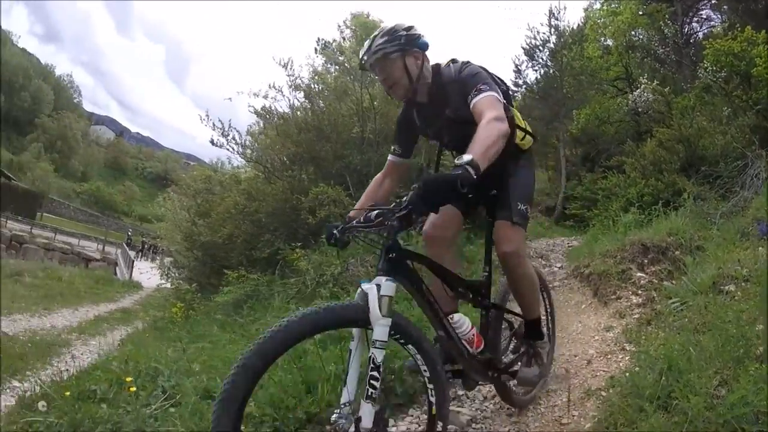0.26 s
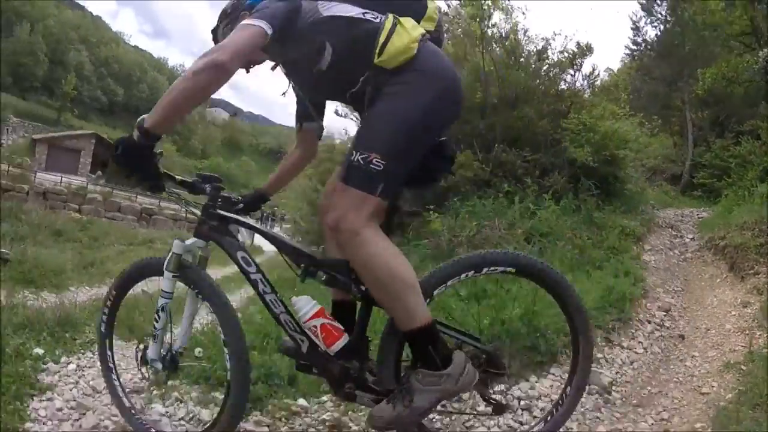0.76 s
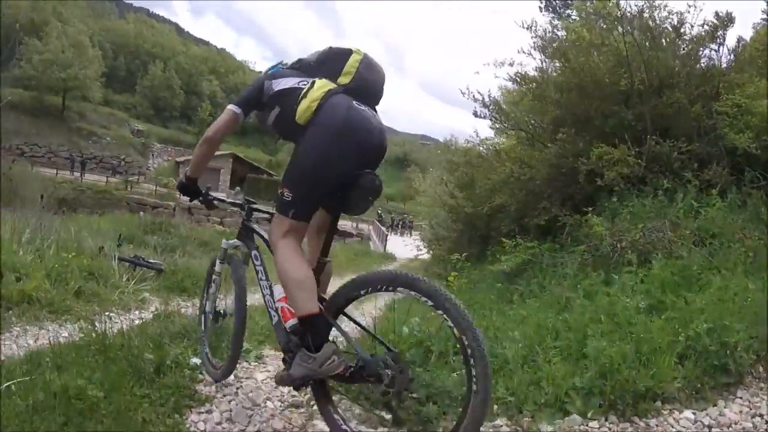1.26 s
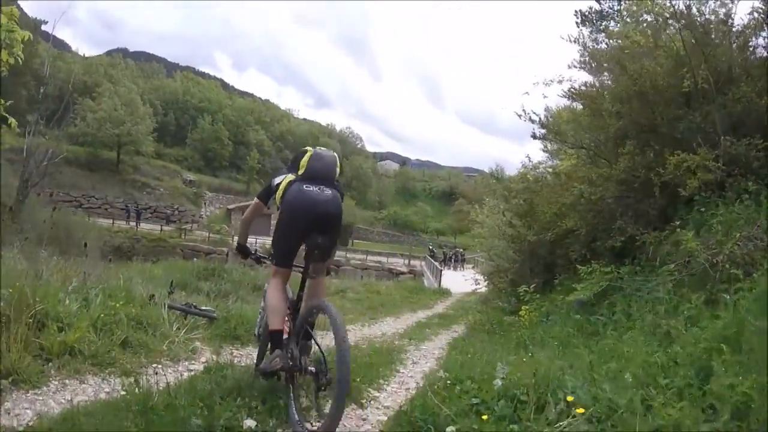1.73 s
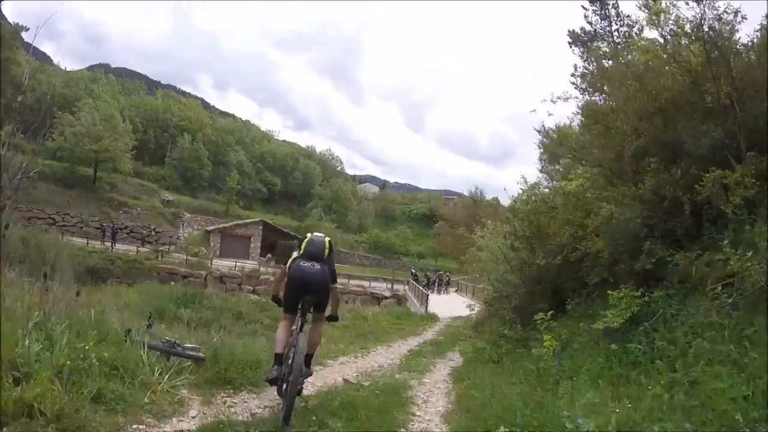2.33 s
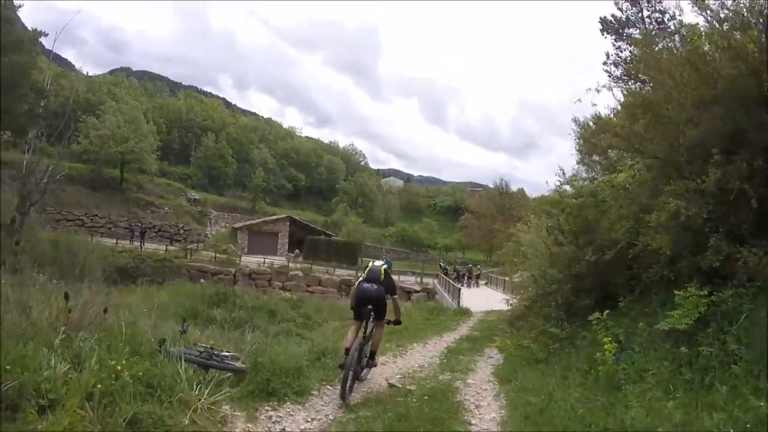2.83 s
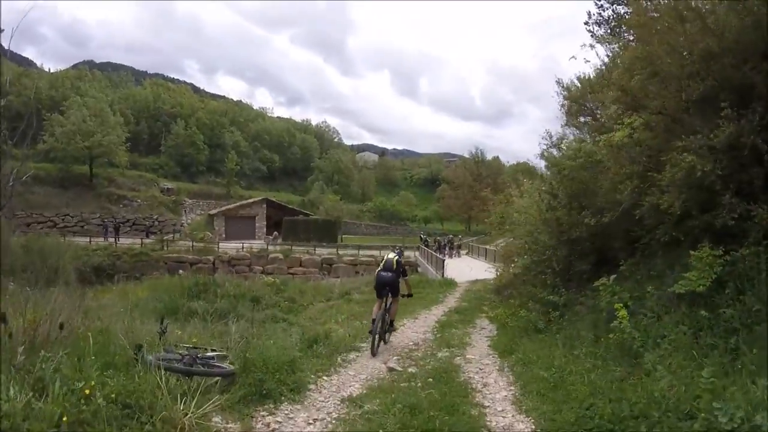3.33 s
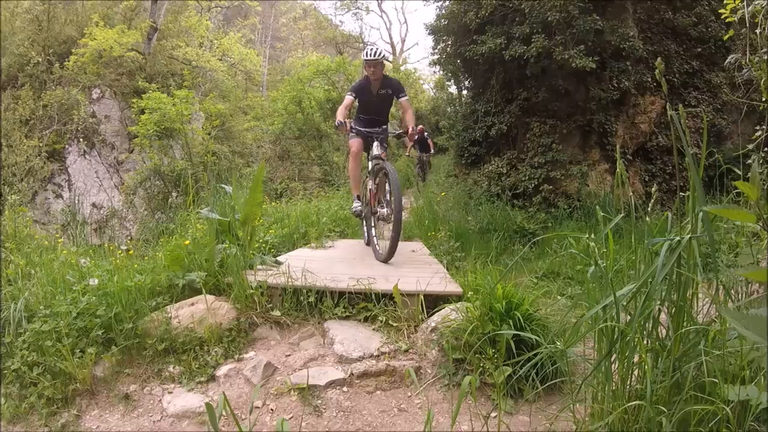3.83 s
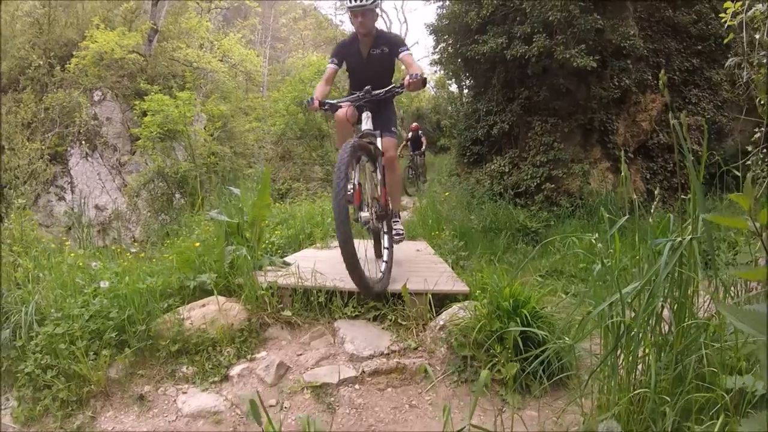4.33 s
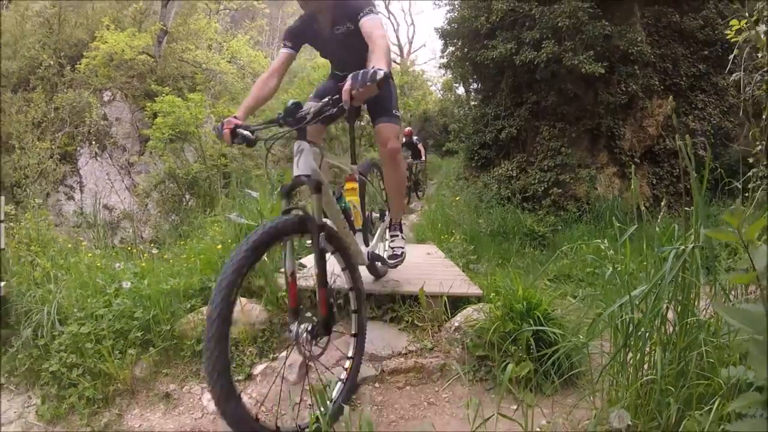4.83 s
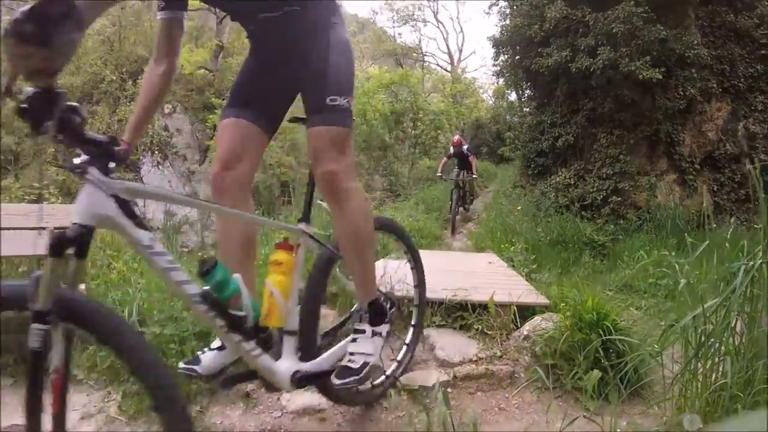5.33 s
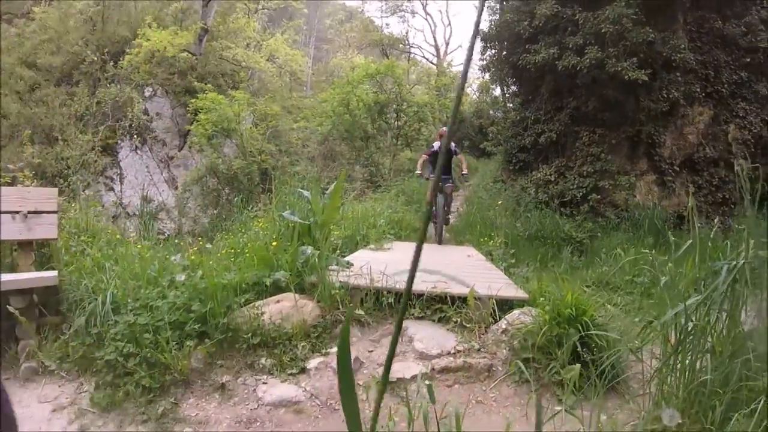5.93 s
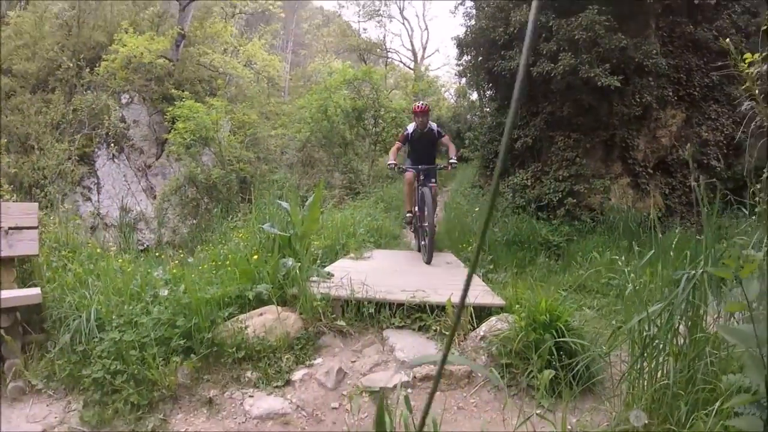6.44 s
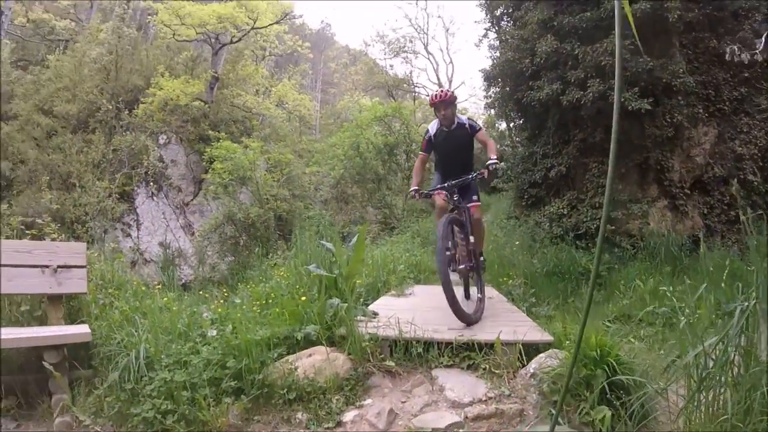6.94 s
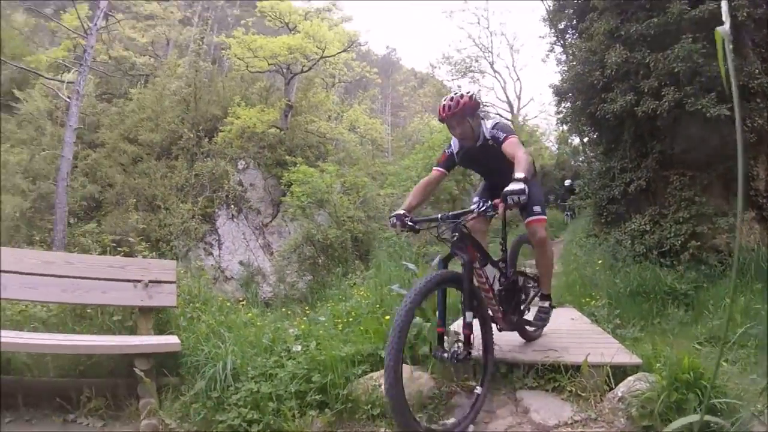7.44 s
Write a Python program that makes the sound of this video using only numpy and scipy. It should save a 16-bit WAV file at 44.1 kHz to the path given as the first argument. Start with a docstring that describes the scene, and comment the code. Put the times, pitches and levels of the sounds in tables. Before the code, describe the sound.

A mountain bike ploughs through loose gravel right beside a small hand-held camera, stones snapping sharply, then recedes. Loud plastic taps and finger rubs knock the case over low rumble and faint hiss. The sound drops out for an instant; afterwards, on a quieter outdoor trail, a few stones crack, a freewheel ticks quickly past, and soft handling thuds follow.

```python
"""Gravel trail: mountain bikes roll past a small hand-held camera; the sound cuts out briefly midway.
Tyres crunch and crack stones: noise grains and bursts through the resonances of the microphone port.
A freewheel ticks: pulses ring the hub. Fingers tap, flick and rub: noise rings the plastic case.
Arm sway, wind, grip throb and case hum rumble below: shaped noise. Far leaves and microphone hiss on."""
import sys
import numpy as np
from scipy import signal
from scipy.fft import rfft, irfft, next_fast_len
from scipy.io import wavfile
from scipy.ndimage import map_coordinates

SR = 44100
rng = np.random.default_rng(int(sys.argv[2]) if len(sys.argv) > 2 else 0)


def bounce(signal):
    """Save signal as a 16-bit WAV file at the path given by the first command-line argument."""
    frames = np.transpose(np.atleast_2d(signal))
    limited = np.clip(frames, -1, 1)
    pcm = np.round(limited * 32767).astype(np.int16)
    wavfile.write(sys.argv[1], SR, pcm)


N = 338688


def amp(db):
    """Gain of a level in dB."""
    return 10 ** (np.asarray(db) / 20)


def unit(x):
    """x at rms 1."""
    return x / np.sqrt(np.mean(x ** 2) + 1e-20)


def seconds():
    """Time of each sample in s."""
    return np.arange(N) / SR


def curves(rows):
    """One value per sample for each column after the time."""
    knots_s, *cols = np.transpose(rows)
    return [np.interp(seconds(), knots_s, col) for col in cols]


def wobble(knots_per_s):
    """Smooth random curve through normal draws."""
    knots = rng.standard_normal(400)
    return map_coordinates(knots, [np.arange(N) * knots_per_s / SR], mode="wrap")


def swells(times_s, levels_db, rise_s, fall_s):
    """Summed gain of swells: Gaussian rise to the peak, exponential fall."""
    out = np.zeros(N)
    for peak_s, db, fall in zip(times_s, levels_db, np.broadcast_to(fall_s, len(times_s))):
        u = seconds() - peak_s
        out += amp(db) * np.exp(-np.where(u < 0, (u / rise_s) ** 2, u / fall))
    return out


def filtered(x, response):
    """x times a complex response of frequency."""
    size = next_fast_len(x.shape[-1] + 8192)
    spectrum = rfft(x, size) * response(np.fft.rfftfreq(size, 1 / SR))
    return irfft(spectrum, size)[..., :x.shape[-1]]


def coloured(points):
    """Noise of rms 1 with a (f/Hz, relative density/dB) spectrum, linear in log f."""
    f, db = np.transpose(points)
    shape = lambda hz: amp(np.interp(np.log(hz + 1), np.log(f), db, -120, -120))
    return unit(filtered(rng.standard_normal(N), shape))


def modes(table, sign):
    """Sum of resonances; like signs leave notches between them, alternate signs fill the valleys."""
    def response(f):
        total = 0
        for k, (centre_hz, width_hz, db) in enumerate(table):
            damping = 1j * f * width_hz
            total = total + sign ** k * amp(db) * damping / (centre_hz ** 2 - f * f + damping)
        return total
    return response


def dull(f, cutoff_hz):
    """Soft contact: a steep causal low-pass of order 8."""
    x = f / cutoff_hz
    return 1 / np.prod([1 - x ** 2 + 2j * np.sin(np.pi * k / 16) * x for k in (1, 3, 5, 7)], axis=0)


def grains(rate, spread_db, life, noise):
    """Random noise puffs, rate a second, decay constant life samples, over a share of plain noise."""
    chance, size = rng.random((2, N))
    size_db = np.minimum(-spread_db * np.log(1 - size), 16)
    starts = amp(size_db) * (chance < rate / SR)
    u = np.arange(400) / life
    puffs = signal.fftconvolve(starts, u * np.exp(-u))[:N] * rng.standard_normal(N)
    return unit(unit(puffs) + noise * rng.standard_normal(N))


def bursts(rows, body, rise, click):
    """Short decaying noise bursts through a body, each scaled to its peak."""
    out, t = np.zeros(N + 4096), np.arange(4096) / SR
    for start_s, peak_db, hz, share_db, t60_s in rows:
        decay = amp(-60 * t / max(t60_s, .001))
        push = rng.standard_normal(len(t)) * decay * (1 - np.exp(-t / rise))
        push[round(rise * SR)] += click  # hard contact
        hit = filtered(push, lambda f: body(f, hz, share_db))
        out[round(start_s * SR):][:len(t)] += amp(peak_db) * hit / np.abs(hit).max()
    return out[:N]


# steady tyre roll: t/s, big-stone level/dB, small over big/dB
ROLL = [(0.0, -49.5, -4.5), (0.2, -47, -15.5), (0.4, -53, -1.5), (0.65, -61.5, -6), (0.95, -62.5, -4.5),
        (1.3, -60.5, -10), (1.47, -71.5, -4), (1.76, -53.5, -14.5), (2.0, -62.5, -11), (2.1, -77.5, -20.5),
        (2.4, -62, -12.5), (3.74, -59, -13.5), (3.8, -62, -9.5), (5.3, -60.5, -12), (5.45, -56.5, -11),
        (6.05, -57.5, -6), (6.15, -56, -18), (6.5, -57, -17), (6.9, -61.5, -10), (7.05, -62, -13.5),
        (7.3, -57.5, -18), (7.68, -57, -15)]
# wheel ploughing through loose gravel: t of peak/s, big-stone level/dB, t60/s, small over big/dB
HEAPS = [(0.1, -55.5, 0.75, -20), (0.199, -47, .3, -20), (0.33, -50.5, 0.64, -26), (0.5, -53, 0.62, -10),
         (0.688, -48.5, 0.43, -7.5), (0.817, -40.5, 0.22, -13), (0.969, -53, 0.32, -9),
         (1.013, -42.5, 0.036, -13), (1.082, -48, 0.25, -13), (1.22, -53, 0.23, -6),
         (1.279, -48.5, .4, -10), (1.531, -47, .12, -10.5), (1.577, -52.5, 0.13, -15)]
HEAP_RISE_S, MIDDLE_OVER_BIG_DB = 0.0064, -2.5
# microphone port resonances: f/Hz, width/Hz, level before the factor of PORT_SIGN/dB
PORT = [(950, 890, -17), (1587, 114, 3.5), (2513, 385, -4), (3364, 554, -7.5), (5600, 470, -15),
        (6040, 390, -9), (7580, 950, -15.5), (9010, 710, -18.5), (11000, 1140, -29), (14100, 1200, -36)]
PORT_SIGN = -1.076  # factor from each mode to the next


def crunch():
    """Big, middle and small gravel: grains of three lives in three bands, through the port."""
    roll_db, small_db = curves(ROLL)
    peak_s, heap_db, t60_s, fine_db = np.transpose(HEAPS)
    fall_s = np.abs(t60_s) / np.log(1000)
    big = amp(roll_db) + swells(peak_s, heap_db, HEAP_RISE_S, fall_s)
    small = amp(roll_db + small_db) + swells(peak_s, heap_db + fine_db, HEAP_RISE_S, fall_s)
    middle = big * amp(MIDDLE_OVER_BIG_DB)
    port = modes(PORT, sign=PORT_SIGN)
    clumps = amp(1.0 * wobble(30))
    sizes = [
        (big, lambda f: dull(f, 2450), grains(rate=300, spread_db=1.5, life=68, noise=0.87)),
        (middle, lambda f: dull(f, 4960) * (f > 1900), grains(rate=430, spread_db=5.5, life=30, noise=1.0)),
        (small, lambda f: f > 4300, grains(rate=460, spread_db=1.0, life=7.1, noise=0.83))]
    out = np.zeros(N)
    for gain, band, x in sizes:
        out += gain * clumps * unit(filtered(x, lambda f: port(f) * band(f)))
    return out


# stones cracking under the tyres: t/s, peak/dB, pitch f/Hz, low-passed share/dB
STONES = [(0.0464, -28, 2600, 6), (0.124, -41, 2480, -8), (0.172, -28, 2560, 7), (0.214, -29, 2200, 18),
          (0.2333, -28.5, 3180, 5), (0.265, -42, 2710, -5), (0.3125, -31, 2420, 7),
          (0.346, -25.5, 3270, -23), (0.377, -37, 2570, -8), (0.407, -31, 2500, 3),
          (0.4808, -33.5, 5970, -13), (0.7085, -31.5, 2370, 6), (0.76, -39, 3370, 0),
          (0.821, -44, 3280, -9), (0.857, -31.5, 2450, 6), (0.9455, -41, 2330, -20),
          (1.0197, -22, 2700, 3.5), (1.0815, -36, 3420, -21), (1.157, -38.5, 3420, -7),
          (1.2156, -50, 2340, 4), (1.28, -30, 2740, -21), (1.3196, -34.5, 2630, -7),
          (1.347, -36.5, 2950, -18), (1.38, -32, 2770, -8.5), (1.412, -36, 3370, 5),
          (1.529, -33, 2340, -18), (1.5776, -30, 2170, -5), (1.59, -32.5, 2400, -20),
          (1.7643, -32.5, 2720, -25), (1.969, -41, 2610, -17), (2.641, -36.5, 2500, -1),
          (4.8663, -40.5, 2560, -15), (4.9207, -29.5, 2540, 5), (5.004, -28, 3350, -4),
          (5.385, -37.5, 4720, -2), (5.445, -46, 4800, -10), (5.5016, -43, 4770, -12),
          (5.5875, -41, 3250, -28), (5.698, -31.5, 2620, 4), (5.8046, -29.5, 3640, -12),
          (7.14, -41, 2660, -8)]
STONE_T60_S = 0.023


def stones():
    """Each stone: a noise burst through one broad resonance plus a low-passed share, then the port."""
    port = modes(PORT, sign=PORT_SIGN)

    def stone(f, hz, weight_db):
        crack = modes([(hz, .4 * hz, 0)], sign=1)(f)
        return port(f) * (crack + amp(weight_db) * dull(f, 2400))
    return bursts([(*row, STONE_T60_S) for row in STONES], stone, rise=.0006, click=3.6)


# hub modes: f/Hz, width/Hz, level/dB
HUB = [(3300, 100, 0), (5860, 66, -5), (8550, 120, -18)]
COAST_START_S, COAST_END_S, COAST_FADE_S, COAST_DB = 5.33, 6.1, 0.057, -57.5
TICKS_PER_S, TICKS_GAIN_PER_S2 = 52, 21  # the bike gathers speed downhill
WHIRR = 0.078  # steady drag of the pawls between ticks


def freewheel():
    """Pawls tick over the ratchet, a little unevenly; each tick rings the hub modes at new strengths."""
    t = seconds()
    coast_s = np.clip(t - COAST_START_S, 0, COAST_END_S - COAST_START_S)
    rate = TICKS_PER_S + TICKS_GAIN_PER_S2 * coast_s
    tooth_count = np.floor(np.cumsum(rate) / SR + .3 * wobble(40))
    teeth = np.diff(tooth_count, prepend=0) > 0
    ticks = teeth * amp(2.2 * rng.standard_normal((len(HUB), N)))
    ticks = signal.fftconvolve(ticks, np.hanning(90)[None], axes=1)[:, :N]
    ticks = (ticks + WHIRR) * rng.standard_normal(N)
    ring = sum(filtered(tick, modes([mode], sign=1)) for tick, mode in zip(ticks, HUB))
    # heard only while the bike is close
    near = np.clip(np.minimum(t - COAST_START_S, COAST_END_S - t) / COAST_FADE_S, 0, 1)
    return amp(COAST_DB) * near * unit(ring)


# plastic case, wall and cavity: f/Hz, width/Hz, level per pass (two passes)/dB
CASE = [(1600, 400, -4), (2060, 330, -1), (2510, 420, 0), (2950, 550, -2.5), (3970, 400, -1.5),
        (4750, 420, -7.5), (5550, 400, -11), (6080, 450, -5.5), (7600, 850, -7.5), (8950, 800, -14),
        (10600, 1300, -21), (12300, 1200, -20), (13500, 1200, -18), (14900, 1200, -17)]
# case walls bending under a heavy touch: f/Hz, width/Hz, level/dB
FLEX = [(790, 140, 0.5), (1557, 830, 5)]


def touch(f, hz, weight_db):
    """The case under a fingertip, which dulls the treble and bends the walls."""
    case = modes(CASE, sign=1)(f) ** 2
    return (case + amp(weight_db) * modes(FLEX, sign=1)(f)) * dull(f, hz)


# fingertip taps: t/s, peak/dB, low-pass f/Hz, wall flex/dB, t60/s, thud/dB
TAPS = [(2.0318, -0.6, 9300, -25, 0.011, -31), (2.915, -41, 7900, -18, 0.024, -38),
        (2.952, -24.5, 6900, -18, .04, -29), (3.3353, -37.5, 7760, -7, 0.013, -58),
        (3.3593, -2, 2920, 11, 0.016, -14), (3.4173, -16, 3020, 4, 0.015, -27),
        (3.463, -15, 2960, -9, 0.014, -39), (3.5139, -20, 3300, -24.5, .012, -29),
        (3.903, -35.5, 9000, -11, 0.014, -44), (3.966, -49, 1480, -4, .01, -31.5),
        (5.547, -37.5, 1700, -15, 0.018, -31), (5.699, -52, 1500, 0, .01, -31),
        (6.012, -51, 805, 3, 0.0087, -24.5), (6.15, -42, 1500, -5, 0.014, -39),
        (6.273, -38, 2000, 0, 0.0092, -47), (6.477, -37.5, 2000, 3, 0.013, -34),
        (6.85, -32.5, 2560, 0, 0.008, -40), (6.892, -38, 3000, 2, .01, -35),
        (6.911, -51, 2540, 0, 0.009, -36), (6.933, -52, 2400, 0, 0.012, -30.5)]
# lowest case mode: f/Hz, width/Hz
HUM = (327.7, 56)


def taps():
    """Noise bursts ring the case; each tap adds a thud, its lowest mode plus a short push."""
    out = bursts([row[:5] for row in TAPS], touch, rise=.0009, click=5)
    u = np.arange(4096) / SR
    ring = np.sin(2 * np.pi * HUM[0] * u) * np.exp(-np.pi * 1.3 * HUM[1] * u)
    push = 0.24 * u / 0.0011 * np.exp(1 - u / 0.0011)
    for row in TAPS:
        out[round(row[0] * SR):][:len(u)] += amp(row[5]) * (ring + push)
    return out


# fingernail flicks: t/s, peak/dB, low-pass f/Hz, treble lift at 4 kHz/dB, t60/s
FLICKS = [(2.032, -22, 15000, 1, 0.0059), (3.045, -42, 9500, -6, 0.018), (3.1247, -31, 11000, -13, 0.019),
          (3.5139, -34, 9100, -17, 0.017), (3.7226, -25.5, 10900, 2, 0.016)]


def flicks():
    """Fingernail bursts ring the case; the nail lifts the treble."""
    def nail(f, hz, lift_db):
        lift = 1 + amp(lift_db) * (f / 4000) ** 2
        return modes(CASE, sign=1)(f) ** 2 * lift * dull(f, hz)
    return bursts(FLICKS, nail, rise=.001, click=1.5)


# finger strokes: start t/s, end t/s, level/dB, change along stroke/dB, low-pass f/Hz, wall flex/dB
STROKES = [(2.03, 2.06, -32.5, -14, 8050, -24), (2.158, 2.194, -48, -10, 8250, -31),
           (2.236, 2.341, -47.5, 2.5, 8200, -37), (2.388, 2.431, -52.5, -1.5, 8150, -32),
           (2.947, 3.057, -42.5, -15.5, 8300, -7), (3.04, 3.138, -50, -6, 7850, -19),
           (3.364, 3.414, -54, -2, 3970, 3), (3.402, 3.478, -50, -4, 6600, 2),
           (3.55, 3.644, -44.5, 8, 3060, 4), (3.557, 3.617, -51, -8, 8800, -15),
           (3.644, 3.688, -47.5, -7.5, 3480, -25), (4.044, 4.365, -63, 1, 11000, 3),
           (6.79, 6.872, -52.5, 6, 2670, 15), (6.873, 6.993, -43, -19.5, 2670, 7)]
PRESS_S, LIFT_S = .012, 0.0098


def strokes():
    """Stick-slip of skin: grains ring the case while the finger presses and slides."""
    t, out = seconds(), np.zeros(N)
    skin = amp(2.5 * wobble(45)) * grains(rate=680, spread_db=-6.0, life=33, noise=2.7)
    for start_s, end_s, db, change_db, hz, weight_db in STROKES:
        a, b = round(start_s * SR), round(end_s * SR) + 1000  # room for the lift
        since_s = t[a:b] - start_s
        press = np.clip(np.minimum(since_s / PRESS_S, (end_s - t[a:b]) / LIFT_S + 1), 0, 1)
        press = press * amp(change_db * since_s / (end_s - start_s))
        out[a:b] += amp(db) * press * unit(filtered(skin[a:b], lambda f: touch(f, hz, weight_db)))
    return out


# slow course of the low sounds: t/s, sway/dB, wind/dB, grip throb/dB, case hum/dB
HANDLING = [(0.0, -44.5, -46.5, -41, -51.5), (0.65, -39, -46.5, -51, -54.5), (1.2, -44, -44.5, -48.5, -75),
            (1.43, -43, -48.5, -60, -73), (1.8, -29, -55, -48.5, -65), (2.15, -46, -56, -52.5, -69),
            (2.6, -40.5, -47, -52.5, -65.5), (3.2, -32, -44.5, -50, -62), (3.55, -36, -48, -51.5, -60),
            (3.7, -27, -57, -47.5, -60), (3.85, -48, -47.5, -58.5, -70), (4.47, -54.5, -44.5, -58, -66),
            (5.3, -47.5, -45.5, -55, -66.5), (5.6, -38, -44, -49.5, -66), (5.95, -35.5, -39, -59, -64),
            (6.1, -32.5, -43, -47, -49), (6.55, -48, -45, -53, -45.5), (6.7, -39, -49, -55.5, -59),
            (6.93, -45.5, -41, -52, -47), (7.05, -36, -46, -62, -66), (7.68, -51, -42.5, -53, -59.5)]
# hand jolts: t of peak/s, throb/dB, hum/dB
JOLTS = [(0.04, -46, -58), (0.19, -52, -65), (0.628, -44, -52), (0.832, -42, -46.5), (1.029, -45, -48),
         (1.27, -52, -57.5), (1.601, -42.5, -53), (1.762, -40.5, -44.5), (1.881, -36, -42.5),
         (2.332, -36.5, -48), (2.861, -44.5, -51), (2.96, -41.5, -45), (3.13, -52, -71), (3.361, -39, -60),
         (3.429, -38.5, -48), (3.511, -38, -69), (3.64, -53, -41.5), (3.979, -41, -65), (4.55, -62, -54),
         (5.555, -42.5, -47), (5.705, -50, -48), (6.159, -42, -46), (6.49, -50, -45), (6.78, -49, -43.5),
         (6.86, -61, -40.5)]
JOLT_RISE_S, JOLT_FALL_S, JOLT_WIND_OVER_THROB_DB = 0.021, 0.023, 3
GUST_DB, GUST_KNOTS_PER_S = 2, 13
# spectra: f/Hz, relative density per Hz/dB
SWAY = [(3, 0.5), (8, -9.5), (20, -4), (32, -19.5)]
WIND = [(18, -36.5), (28, -1), (50, -6.5), (75, -12.5), (140, -49.5)]
THROB = [(35, -36.5), (70, -4.5), (130, -6), (220, -14.5), (500, -43)]


def handling():
    """Arm sway, gusty wind rumble and hand throb as shaped noise; grip slips hum the squeezed case."""
    sway_db, wind_db, throb_db, hum_db = curves(HANDLING)
    peak_s, jolt_db, squeeze_db = np.transpose(JOLTS)
    jolts = swells(peak_s, jolt_db, JOLT_RISE_S, JOLT_FALL_S)
    squeezes = swells(peak_s, squeeze_db, JOLT_RISE_S, JOLT_FALL_S)
    sway = amp(sway_db + GUST_DB * wobble(GUST_KNOTS_PER_S)) * coloured(SWAY)
    wind_gain = amp(wind_db + GUST_DB * wobble(GUST_KNOTS_PER_S))
    wind = (wind_gain + amp(JOLT_WIND_OVER_THROB_DB) * jolts) * coloured(WIND)
    throb = (amp(throb_db) + jolts) * unit(amp(2.7 * wobble(20)) * coloured(THROB))
    slips = grains(rate=270, spread_db=1.5, life=17, noise=0.33)
    lowest = modes([(*HUM, 0)], sign=1)
    hum = unit(filtered(slips, lambda f: (lowest(f) + 0.46) * dull(f, 422) * (f > 120)))
    hum_gain = amp(hum_db + 0.5 * wobble(17)) + squeezes
    return sway + wind + throb + hum_gain * hum


# far leaves and microphone hiss: f/Hz, relative density per Hz/dB
AIR = [(120, -16.5), (200, 2.5), (544, -0.5), (1110, -5.5), (1210, -4.5), (1540, -17), (1910, -6.5),
       (2600, -8), (5300, -18), (6020, -20), (6710, -24), (14400, -33), (15500, -61)]


def hiss():
    """Shaped noise whose level wavers slowly."""
    return amp(-59.5 + 3.2 * wobble(2.814)) * coloured(AIR)


def scene():
    """Sum of all sources, one channel."""
    tyres = crunch() + stones()
    fingers = taps() + flicks() + strokes()
    return (tyres + freewheel() + fingers + handling() + hiss())[None]


# mute: start t/s, end t/s
SILENCE = (3.752, 3.802)
MUTE_FADE_OUT_S, MUTE_FADE_IN_S, TOP_HZ = 0.0076, 0.021, 15900


def record(dry):
    """Fades to a short silence and back; removes all above the band limit."""
    t = seconds()
    before, after = (SILENCE[0] - t) / MUTE_FADE_OUT_S, (t - SILENCE[1]) / MUTE_FADE_IN_S
    gate = np.clip(np.maximum(before, after), 0, 1)
    return filtered(dry * gate, lambda hz: hz < TOP_HZ)


dry = scene()
out = record(dry)
bounce(out)
```